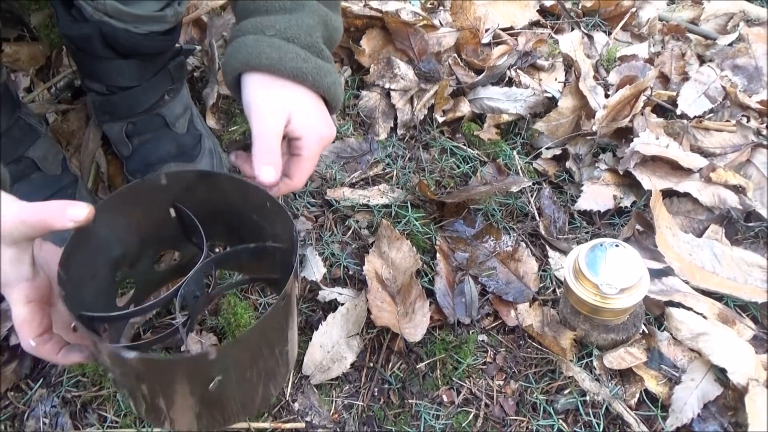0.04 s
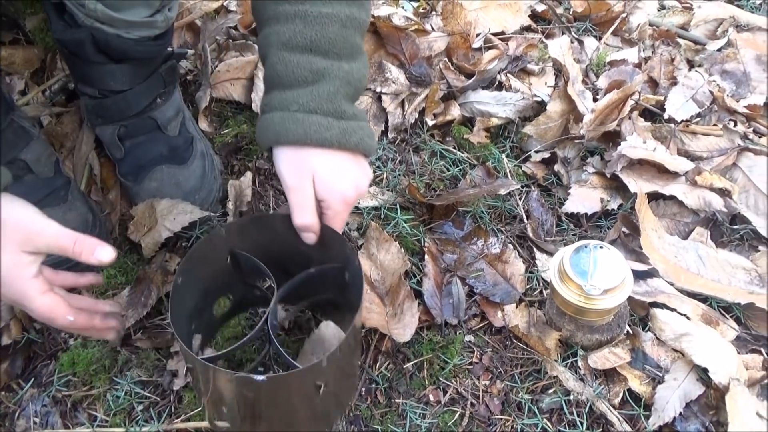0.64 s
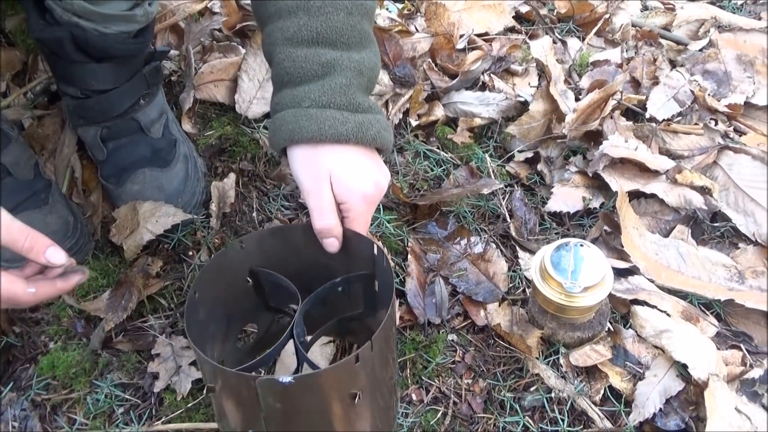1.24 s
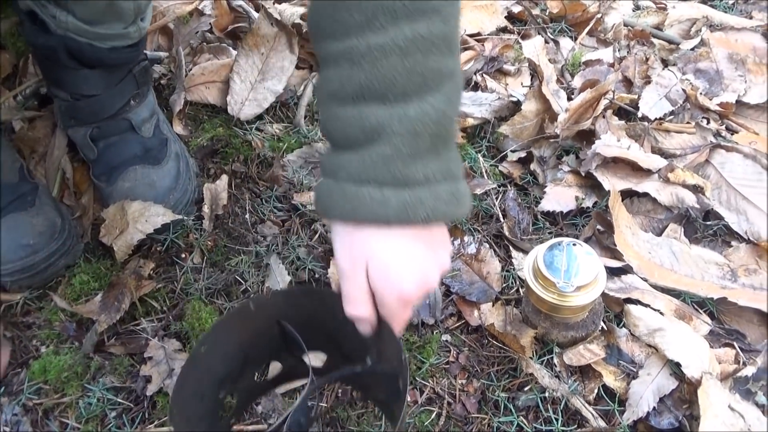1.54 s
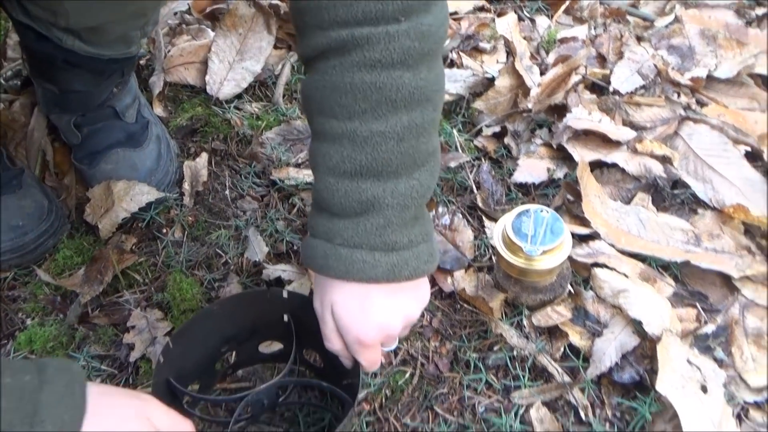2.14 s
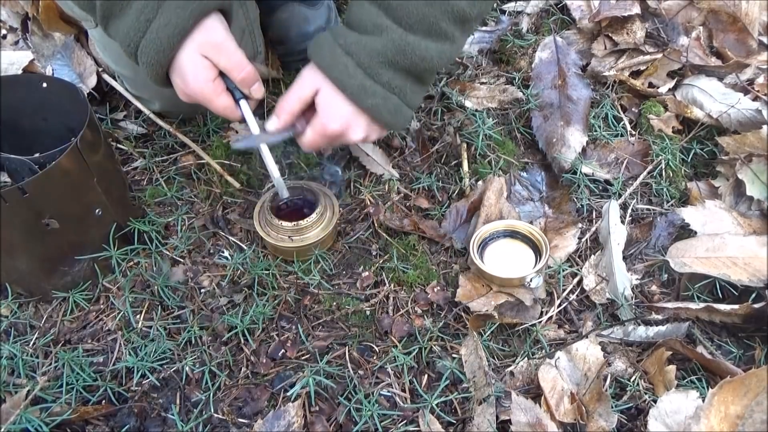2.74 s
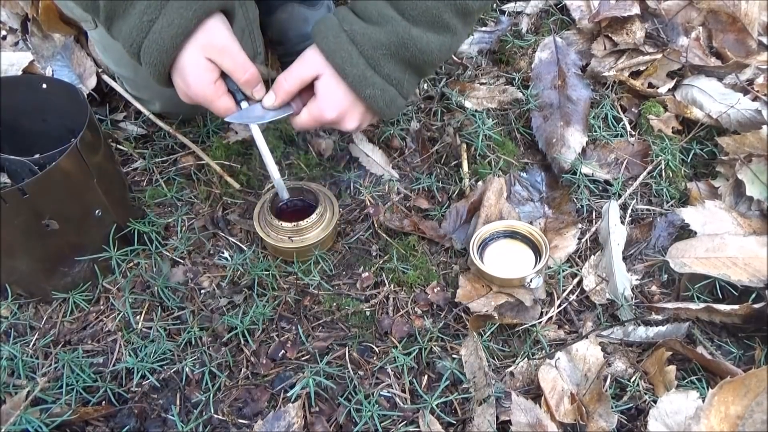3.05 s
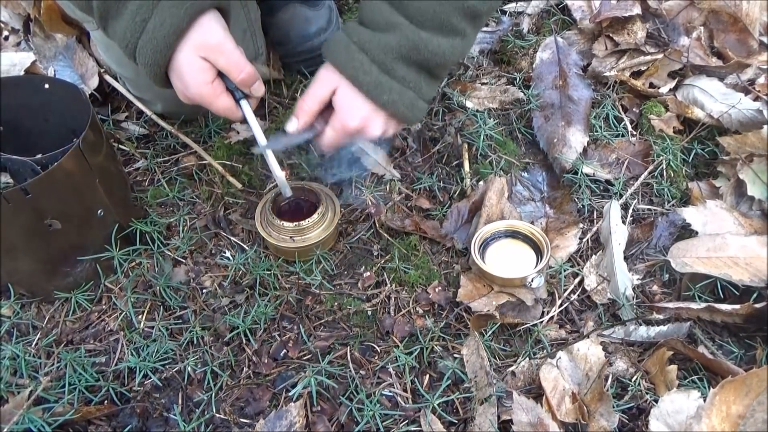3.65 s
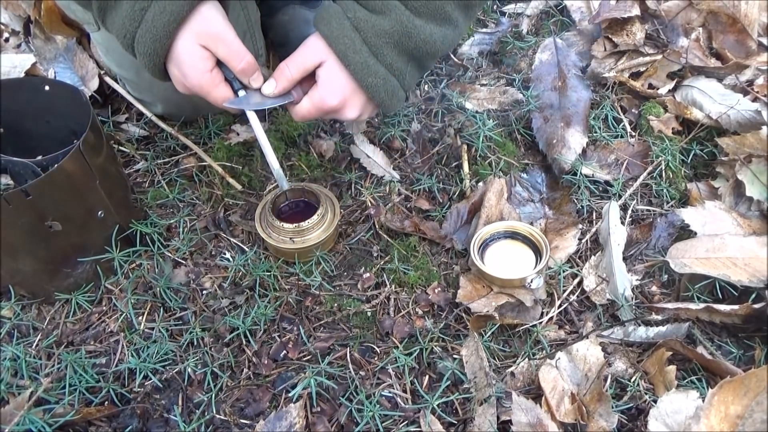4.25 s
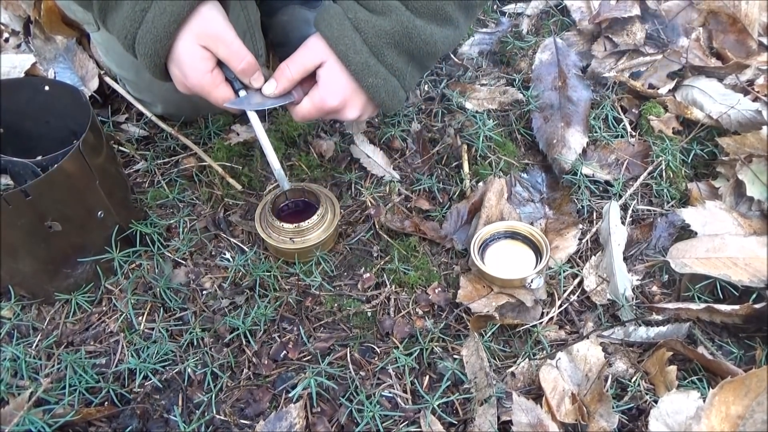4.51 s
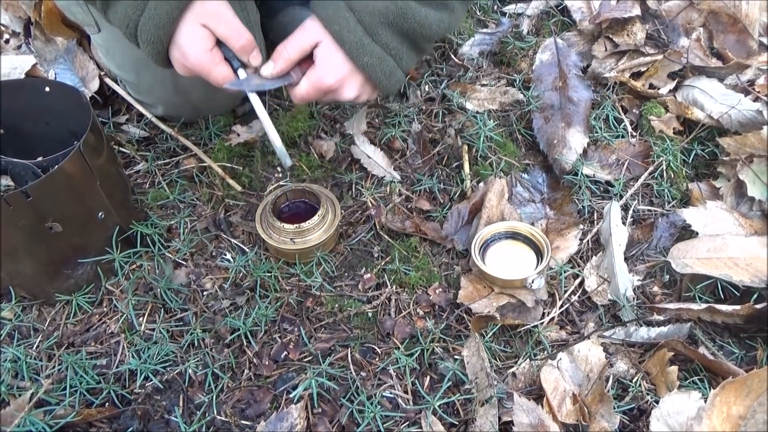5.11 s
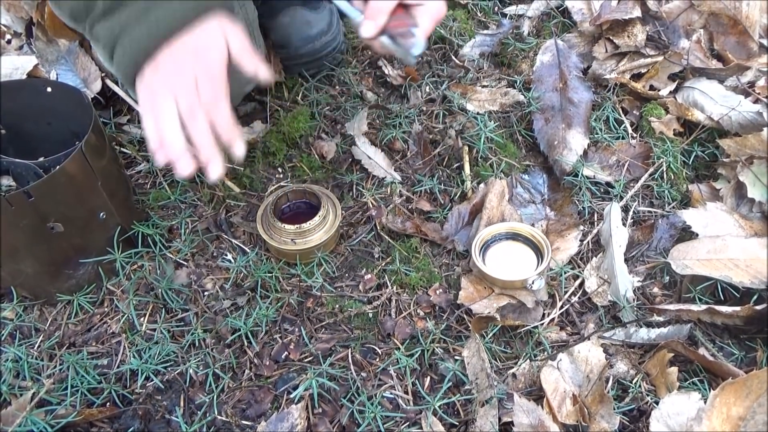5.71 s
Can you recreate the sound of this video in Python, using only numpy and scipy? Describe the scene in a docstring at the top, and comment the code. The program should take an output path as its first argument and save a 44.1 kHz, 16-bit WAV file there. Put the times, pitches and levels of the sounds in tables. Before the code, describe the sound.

A thin steel stove screen is handled close to the microphone, with light clinks from the start building to a bright rattle between 0.5 and 0.9 seconds. After a few small taps, it is dragged over leaf litter in crunchy, ringing jerks from about 1.8 seconds, ending with a bump at 2.4. At 2.5 a blade rasps sharply down a ferro rod, then slides lightly back up. A second short rasp comes at 3.3, followed by crackling spark pops until 3.6 and another soft return slide. The rest is quiet: a small tick near 4.8 and a faint metallic slip of the blade at 5.3. Sleeves and dry leaves rustle softly with the movements until nearly 6 seconds. Underneath lies the steady distant hush of a wood, joined from about 2.9 seconds by a very faint, high, pulsing whine.

```python
"""Thin steel rattles close to the microphone: a stove screen is knocked about, then dragged aside over
leaf litter in a quiet wood. A blade is scraped twice down a ferro rod over a small burner; each rasp
tears off chips and throws crackling sparks, and the blade slides lightly back up. At last it slips off
as the hands lift. Sleeves and dry leaves stir nearby, over a distant hush and a very faint pulsing whine."""
import sys
import numpy as np
from scipy import signal
from scipy.fft import rfft, irfft
from scipy.io import wavfile
from scipy.ndimage import uniform_filter1d, map_coordinates

SR = 44100
rng = np.random.default_rng(int(sys.argv[2]) if len(sys.argv) > 2 else 0)


def store_pcm(level_fs):
    """Save levels as 16-bit WAV."""
    pcm = np.round(np.clip(level_fs, -1, 1) * 32767).astype(np.int16)
    wavfile.write(sys.argv[1], SR, np.atleast_2d(pcm).T)


N = 259037
TIME = np.arange(N) / SR

# hard strokes down the rod: (time [s], length [s], attack [s], final level [dB], body re treble [dB])
ROD_STROKES = [(2.49, 0.091, 0.013, -20.5, -10.5), (3.305, 0.082, 0.03, -20, -11.5)]
# light slides back up the rod: (time [s], length [s], attack [s], final level [dB], swell [dB])
RETURN_SLIDES = [(2.695, 0.19, 0.105, -39.5, -4.5), (3.584, 0.25, 0.045, -46, -5)]
# spectrum of the blade rasping on the rod: (frequency [Hz], level [dB])
RASP_COLOUR = [(50, -55), (180, -16.5), (400, -18.5), (750, -11.5), (1300, -18.5), (2000, -8.5),
               (4000, -11.5), (5400, -5.5), (7700, -13), (9400, -15), (11700, -11), (13200, -13),
               (15500, -28)]


def rod_strokes(top_hz=3040, tip_hz=2100, thud_hz=427.2):
    """The edge tears chips from the rod: coarser, lower and with more thud towards the tip."""
    # light scratches as the edge is set down or runs out:
    # (time [s], length [s], level [dB], body re treble [dB])
    scratches = [(3.221, 0.018, -42.5, -0.5), (3.269, 0.034, -43.5, 0), (3.424, 0.014, -32.5, -12.5)]
    # bending modes of the rod: (multiple of its note, width [Hz], level [dB])
    rod_modes = [(1, 517, 7), (1.85, 620, -4)]
    place = blade_place()
    chips = grit(per_s=7000, spread_db=2.5 + 3 * place)
    presses = [(envelope(start, length, attack, release=0.099, db=db, swell_db=3), body_db)
               for start, length, attack, db, body_db in ROD_STROKES]
    presses += [(envelope(start, length, attack=0.0086, release=0.21, db=db), body_db)
                for start, length, db, body_db in scratches]
    treble = chips * sum(force for force, _ in presses)
    body = chips * sum(force * from_db(body_db) for force, body_db in presses)
    rasp = body_and_treble(body * from_db(-2), treble, RASP_COLOUR)
    rasp += from_db(-6) * resonate(body, rod_modes, top_hz + (tip_hz - top_hz) * place)
    rasp += from_db(-9) * resonate(body * place, [(thud_hz, 500, 0)], pitch=1)
    gripped_ring = through(rasp, dying_noise(t60=0.012))
    return rasp + from_db(-7) * gripped_ring


def spark_pops():
    """Sparks and grit pop, each one sharp click with a brief sizzle."""
    # pops: (time [s], relative level [dB], body re treble [dB])
    pops = [(0.535, -23.5, -10), (2.082, -32, -22), (2.1151, -27.5, -22), (2.174, -30, -18),
            (2.2268, -33, -18), (2.5922, -26, 0.5), (2.69, -41, -12), (3.3844, -21.5, -0.5),
            (3.4039, -23.5, -2), (3.48, -29.5, -6.5), (3.499, -24, -8), (3.5106, -32, -15),
            (3.539, -38.5, -4.5), (3.5803, -38, -2), (3.6004, -34, -6), (3.608, -24.5, -25),
            (3.627, -27.5, -19), (3.6387, -33, -13)]
    # spectrum of a pop: (frequency [Hz], level [dB])
    pop_colour = [(100, -60), (700, -22), (2000, -6), (3500, -7), (7000, -19), (9800, 0), (11300, 7),
                  (12800, 4.5), (15500, -11)]
    treble, body = np.zeros(N), np.zeros(N)
    for start, db, body_db in pops:
        at = round(start * SR)
        treble[at], body[at] = from_db(db), from_db(db + body_db)
    clicks = body_and_treble(body, treble, pop_colour)
    sizzle = through(clicks, dying_noise(t60=0.024))
    return from_db(19) * (clicks + from_db(-5) * sizzle)


def blade_slides(low_cut_hz=1500):
    """Fine, juddering friction excites the blade as it glides without biting, and as it slips off."""
    # resonances of the sliding blade: (nominal frequency [Hz], width [Hz], level [dB])
    blade_modes = [(2150, 350, -1), (3000, 600, -1), (4250, 500, -.5), (5050, 450, .5), (7900, 900, -10),
                   (11400, 900, 1.5), (13000, 1800, -7)]
    # resonances of its tip slipping off: (frequency [Hz], width [Hz], level [dB])
    tip_modes = [(2430, 270, 0), (4300, 450, 4), (5120, 510, 7.5), (7070, 580, -4), (10100, 1900, -4),
                 (13200, 2000, -22)]
    friction = grit(per_s=16000, spread_db=-1) * from_db(2 * wander(per_s=370) + wander(per_s=45))
    place = blade_place()
    # the pitch rises in mid-slide and sags towards the top of the rod
    pitch = 0.94 + 0.058 * np.sin(np.pi * place) - 0.038 * (1 - place)
    glide = sum(envelope(start, length, attack, release=0.084, db=db, swell_db=swell_db)
                for start, length, attack, db, swell_db in RETURN_SLIDES)
    blade = resonate(friction * glide, blade_modes, pitch, waver=0.04)
    rod_hiss = from_db(-11) * through(grit(per_s=9700, spread_db=1.5) * glide, response(RASP_COLOUR))
    slip = envelope(start=5.308, length=0.061, attack=0.035, release=0.04, db=-40)
    tip = resonate(friction * slip, tip_modes, pitch=1)
    return butterworth(blade + rod_hiss + tip, 3, low_cut_hz, "high")


def blade_place():
    """0 at the top of the rod, 1 at its tip: each stroke speeds down it, each slide returns evenly."""
    down = sum(progress(start, length) ** 2 for start, length, *_ in ROD_STROKES)
    return down - sum(progress(start, length) for start, length, *_ in RETURN_SLIDES)


def screen_knocks(rise_s=0.0011):
    """Rubbing, and knocks that are each a quick rattle of contacts, drive the dense modes of thin steel."""
    # loose steel parts knock together:
    # (time [s], relative level [dB], body re treble [dB], rattle decay [s], favoured resonance [Hz])
    knocks = [(0.0034, -33, -14, 0.0078, 2500), (0.168, -24.5, -9, 0.0039, 2270),
              (0.3901, -21.5, -6.5, 0.0038, 4320), (0.4339, -28, -15, 0.009, 3600),
              (0.5088, -24, -10, 0.0052, 4600), (0.5448, -24.5, -8, 0.0049, 4600),
              (0.5995, -17, -17, 0.01, 4700), (0.6114, -16, -8.5, 0.0059, 4600),
              (0.6226, -21, -15, 0.0037, 4500), (0.656, -10, -14, 0.0052, 7700),
              (0.6714, -17.5, -12, 0.0068, 4430), (0.6938, -14, -11.5, 0.0072, 4460),
              (0.704, -6.5, -25, 0.0025, 4460), (0.7463, -32, 1.5, 0.0096, 4960),
              (0.791, -6, -14, 0.0033, 2780), (0.824, -9, -27, 0.0046, 5900),
              (1.9175, -19.5, -15, 0.003, 4400), (1.9565, -16, -15, 0.0022, 4400)]
    # steel rubs on steel between the knocks: (time [s], length [s], relative level [dB])
    rubs = [(0.056, 0.015, -41), (0.243, 0.029, -40.5), (0.277, 0.019, -47), (0.374, 0.022, -38),
            (0.419, 0.028, -36), (0.525, 0.065, -38.5), (0.598, 0.034, -24.5), (0.654, 0.06, -26),
            (0.736, 0.1, -29)]
    # spectrum of the knocked sheet: (frequency [Hz], level [dB])
    knock_colour = [(100, -65), (600, -13.5), (1100, -4), (1800, -9), (2600, 1), (3400, -3.5), (4500, 0),
                    (6300, 2), (8000, 4), (9400, 3), (10300, 9.5), (11900, 8), (13000, -3), (15500, -17)]
    treble_power = sum(envelope(start, length, attack=0.014, release=0.086, db=db - 1) ** 2
                       for start, length, db in rubs)
    body_power = treble_power * from_db(-8) ** 2
    note_hz = np.full(N, float(knocks[0][-1]))
    t = TIME[:6000]
    for start, db, body_db, rattle_s, hz in knocks:
        at = round(start * SR)
        force = from_db(db + 1) * np.exp(-t / rattle_s) * (1 - np.exp(-t / rise_s))
        treble_power[at:at + len(t)] += force ** 2
        body_power[at:at + len(t)] += (force * from_db(body_db)) ** 2
        note_hz[at:] = hz
    body, treble = np.sqrt(body_power), np.sqrt(treble_power)
    contacts = grit(per_s=7000, spread_db=3)
    sheet = body_and_treble(contacts * body, contacts * treble, knock_colour)
    sheet += from_db(-4) * resonate(grit(per_s=7000, spread_db=3) * body, [(1, 600, 0)], note_hz)
    shimmer = through(sheet, dying_noise(t60=0.051))
    return from_db(-3) * (sheet + shimmer) + from_db(-8) * screen_ring(contacts * treble)


def screen_drag(catch_db=1.9, judder_db=1.55):
    """The rim catches and crunches over needles and grit, and the sheet shimmers and rings."""
    # jerks over the ground:
    # (time [s], length [s], final relative level [dB], swell [dB], relative weight of the body [dB])
    jerks = [(1.759, 0.022, -40, 5, -6), (1.784, 0.066, -18.5, 10.5, -11.5), (1.861, 0.023, -20.5, 2, -10),
             (1.972, 0.263, -40, 0, -6), (2.295, 0.071, -28, 23, -10)]
    # spectrum of the dragged sheet: (frequency [Hz], level [dB])
    drag_colour = [(80, -55), (500, -23), (1200, -19), (2500, -15), (6500, -16), (9500, -7), (11000, -.5),
                   (11900, .5), (13300, -7), (15500, -21)]
    contacts = grit(per_s=7000, spread_db=2.5)
    contacts *= from_db(catch_db * wander(per_s=55) + judder_db * wander(per_s=160))
    treble, body = np.zeros(N), np.zeros(N)
    for start, length, db, swell_db, body_db in jerks:
        pull = contacts * envelope(start, length, attack=0.005, release=0.091, db=db, swell_db=swell_db)
        treble += pull
        body += pull * from_db(body_db - 1)
    scrape = body_and_treble(body, treble, drag_colour)
    shimmer = from_db(-1) * through(scrape, dying_noise(t60=0.034))
    return from_db(-2) * (scrape + shimmer + from_db(-9) * screen_ring(treble))


def screen_ring(drive, longest_t60=0.15):
    """The clearest modes of the screen sing on briefly after each contact, damped by the hand."""
    # modes of the screen: (frequency [Hz], level [dB], t60 before the hand's damping [s])
    screen_modes = [(2638, -15, 0.13), (4468, -21, 0.2), (4581, -13, 0.11), (5362, -22, 0.19),
                    (5943, -12, 0.098), (6358, -18, 0.092), (6982, -16, 0.11), (8570, -20, 0.12),
                    (8769, -14, 0.065), (8969, -26, 0.13), (9905, -12, 0.11), (10190, -2, 0.071),
                    (10570, -17, 0.094), (10770, -1, 0.059), (11010, -21, 0.095), (11250, -14, 0.095),
                    (11310, -8, 0.071), (11850, 0, 0.052), (12070, -1, 0.064), (12210, -3, 0.061),
                    (12870, -12, 0.062), (13340, -10, 0.065)]
    t = TIME[:12000]
    ring = sum(from_db(db - 60 * t / min(t60, longest_t60)) * np.sin(2 * np.pi * hz * t)
               for hz, db, t60 in screen_modes)
    return through(drive, unit_energy(ring))


def taps_and_snaps():
    """Short damped taps, thumps and snaps, each a band of noise around its own pitch; among them are a low
    clonk of the screen and its rim striking the ground."""
    # taps: (time [s], level [dB], centre [Hz], width [octaves], t60 [s])
    taps = [(0.792, -42, 1120, 0.13, 0.11), (1.43, -40.5, 354, 0.55, 0.02),
            (1.512, -45.5, 3500, 2.5, 0.012), (1.625, -33, 1950, 2.1, 0.01),
            (1.64, -41.5, 3000, 3.7, 0.012), (1.844, -35, 2530, 0.45, 0.049),
            (2.166, -35.5, 790, 1.7, 0.0084), (2.367, -25.5, 990, 1.1, 0.023),
            (2.368, -34, 224, 1.2, 0.046), (2.401, -33, 2000, 1.9, 0.009), (3.497, -43, 2350, 0.5, 0.07),
            (4.127, -55, 1500, 1.8, 0.03), (4.769, -47, 2900, 0.8, 0.027), (4.771, -47, 9000, 1.5, 0.014)]
    out = np.zeros(N)
    for start, db, hz, octaves, t60 in taps:
        edges_hz = np.clip(hz * 2 ** (np.array([-0.5, 0.5]) * octaves), 20, SR * 0.45)
        tap = unit_energy(butterworth(dying_noise(t60), 2, edges_hz, "band"))
        duration_s = t60 / np.log(1e6) + 0.0037  # longer taps carry more energy
        at = round(start * SR)
        out[at:at + len(tap)] += tap * from_db(db) * np.sqrt(SR * duration_s)
    return out


def rustle(rest_db=-60.5, ticks_per_s=45):
    """Sleeves give a soft, grainy hiss; dry leaves add scattered ticks that swell less with movement."""
    # movements: (time [s], length [s], final level [dB], swell [dB])
    moves = [(-0.1, 0.97, -50.5, 3.5), (0.9, 0.26, -54.5, 2), (1.312, 0.73, -45, 5),
             (2.03, 0.46, -43.5, -2.5), (2.7, 0.8, -53.5, 7.5), (5.1, 0.72, -55, 7)]
    # spectrum of cloth and leaves: (frequency [Hz], level [dB])
    rustle_colour = [(71, -27), (120, -3.5), (271, -2.5), (519, -4), (748, 1), (1350, -1), (3050, -4),
                     (8420, -10), (11700, -6), (15500, -11)]
    ticks = (rng.random(N) < ticks_per_s / SR) * rng.standard_normal(N) * np.sqrt(SR / ticks_per_s)
    power = sum(envelope(start, length, attack=0.11, release=0.5, db=db, swell_db=swell_db) ** 2
                for start, length, db, swell_db in moves)
    effort = np.sqrt(1 + power / from_db(rest_db) ** 2)
    cloth = grit(per_s=5000, spread_db=1) * effort
    leaves = from_db(-7) * ticks * effort ** 0.79
    return from_db(rest_db) * through(cloth + leaves, response(rustle_colour))


def faint_whine(pitch_hz=3530, first_s=2.932, period_s=0.04, half_width_s=0.0066):
    """A very faint whine sets in and pulses evenly, its pitch wavering a little."""
    onset_s = first_s - period_s / 2
    from_peak_s = (TIME - onset_s) % period_s - period_s / 2
    pulses = np.exp(-(from_peak_s / half_width_s) ** 2) * (TIME > onset_s)
    hz = pitch_hz * (1 + 0.012 * wander(per_s=60))
    return from_db(-60) * pulses * np.sin(2 * np.pi * np.cumsum(hz) / SR)


def woodland_air():
    """A steady distant hush, central in the bass and wide higher up."""
    # spectrum of the still air: (frequency [Hz], relative level [dB])
    air_colour = [(18, -69), (30, -21), (111, -0.5), (324, 0), (359, -2), (455, -3.5), (505, -3.5),
                  (897, 0), (1510, -15.5), (2490, -19.5), (2910, -19), (3400, -20), (8500, -22.5),
                  (12900, -29), (15500, -38)]
    # stereo width of the air: (frequency [Hz], relative side level [dB])
    width_colour = [(60, -20), (170, -14.5), (350, -4.5), (800, 0), (2000, 9.5), (12000, -7)]
    mid, side = (through(rng.standard_normal(N), response(air_colour)) for _ in range(2))
    side = from_db(-7) * through(side, response(width_colour))
    return from_db(-50.5) * (mid + side * np.array([[1], [-1]]))


def over_ground(x, left_db, scatter_db, band_hz=(350, 12000)):
    """The ground scatters a short, duller echo that sets the microphone's left and right apart."""
    dull = butterworth(x, 1, band_hz, "band")
    side = from_db(scatter_db) * through(dull, dying_noise(t60=0.027))
    return (x + side * np.array([[1], [-1]])) * from_db([[left_db / 2], [-left_db / 2]])


def grit(per_s, spread_db):
    """Random tiny slips of uneven size, with even power from one hundredth of a second to the next."""
    sizes = from_db(spread_db * np.minimum(rng.exponential(1, N), 4)) * rng.choice([-1, 1], N)
    slips = sizes * (rng.random(N) < per_s / SR)
    return slips / np.sqrt(np.abs(uniform_filter1d(slips ** 2, size=400)) + 1e-6)


def resonate(drive, modes, pitch, waver=0, block=256):
    """Parallel resonances follow a pitch curve, each free to waver on its own; power is kept."""
    out = np.zeros(N)
    driven_blocks = np.unique(np.flatnonzero(np.abs(drive) > 1e-7) // block) * block
    for hz, width_hz, db in modes:
        radius, state = np.exp(-np.pi * width_hz / SR), np.zeros(2)
        angle = 2 * np.pi * hz * pitch * (1 + waver * wander(per_s=19)) / SR
        for i in driven_blocks:
            poles = [1, -2 * radius * np.cos(angle[i]), radius ** 2]
            part, state = signal.lfilter([1, 0, -1], poles, drive[i:i + block], zi=state)
            out[i:i + block] += part * from_db(db) * (1 - radius ** 2) / 2
    return out / np.sqrt(sum(np.pi * width_hz / SR * from_db(db) ** 2 for _, width_hz, db in modes))


def dying_noise(t60, size=12000):
    """Countless modes or echoes that die together."""
    return unit_energy(rng.standard_normal(size) * from_db(-60 * TIME[:size] / t60))


def body_and_treble(body, treble, colour, split_hz=9000):
    """Two drives sound the lower and the upper part of one colour."""
    low, high = (unit_energy(butterworth(response(colour), 5, split_hz, kind)) for kind in ("low", "high"))
    return through(body, low) + through(treble, high)


def response(colour, size=4096):
    """Minimum-phase impulse response with the given colour, at unit energy."""
    hz, db = np.transpose(colour)
    log_hz = np.log(np.fft.rfftfreq(size, 1 / SR) + 1)
    gain = from_db(np.interp(log_hz, np.log(hz), db))
    cepstrum = irfft(np.log(gain))
    cepstrum[1:size // 2] *= 2
    cepstrum[size // 2 + 1:] = 0
    return unit_energy(irfft(np.exp(rfft(cepstrum))))


def envelope(start, length, attack, release, db, swell_db=0):
    """Attack, a hold that swells to its final level, then a release that loses 60 dB in its time."""
    fall = np.clip((TIME - start - length) / release, 0, 3)
    return progress(start, attack) * from_db(db + swell_db * (progress(start, length) - 1) - 60 * fall)


def progress(start, length):
    """Share of a movement that is done: 0 before it, 1 after it."""
    return np.clip((TIME - start) / length, 0, 1)


def wander(per_s):
    """Smooth random drift with a spread of about 1."""
    points = rng.standard_normal(int(N / SR * per_s) + 4)
    return map_coordinates(points, [TIME[::64] * per_s], order=3, mode="nearest").repeat(64)[:N]


def through(x, impulse):
    """Pass a sound through an impulse response."""
    return signal.oaconvolve(x, impulse)[:N]


def butterworth(x, order, hz, kind):
    """Low-, high- or band-pass a sound."""
    return signal.sosfilt(signal.butter(order, hz, kind, fs=SR, output="sos"), x)


def unit_energy(x):
    """Scale a response so that it keeps the power of white noise."""
    return x / np.sqrt(np.sum(x ** 2) + 1e-20)


def from_db(db):
    """Decibels to gain."""
    return 10 ** (np.asarray(db) / 20)


def scene():
    """Screen and fire steel close by and slightly left, handling and loose taps in the centre, the wood all
    around."""
    knocks = over_ground(screen_knocks(), left_db=2, scatter_db=-10.5)
    drag = over_ground(screen_drag(), left_db=1.5, scatter_db=-14)
    fire_steel = over_ground(rod_strokes() + blade_slides() + spark_pops(), left_db=1, scatter_db=-14.5)
    handling = over_ground(rustle() + taps_and_snaps(), left_db=0, scatter_db=-7)
    return knocks + drag + fire_steel + handling + woodland_air() + faint_whine()


def record(dry):
    """The highest treble is cut steeply."""
    cutoff_hz = 15900
    return signal.sosfilt(signal.ellip(10, 0.2, 70, cutoff_hz, fs=SR, output="sos"), dry)


dry = scene()
out = record(dry)
store_pcm(out)
```